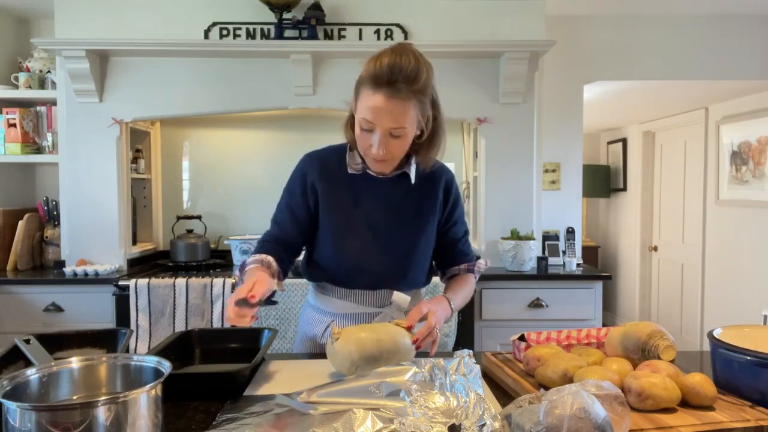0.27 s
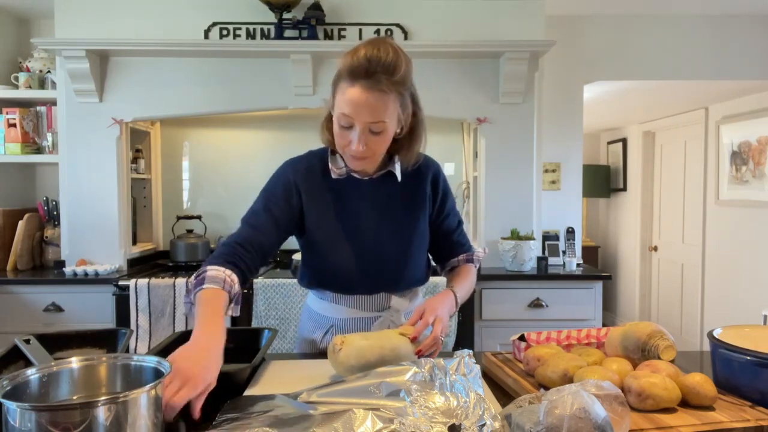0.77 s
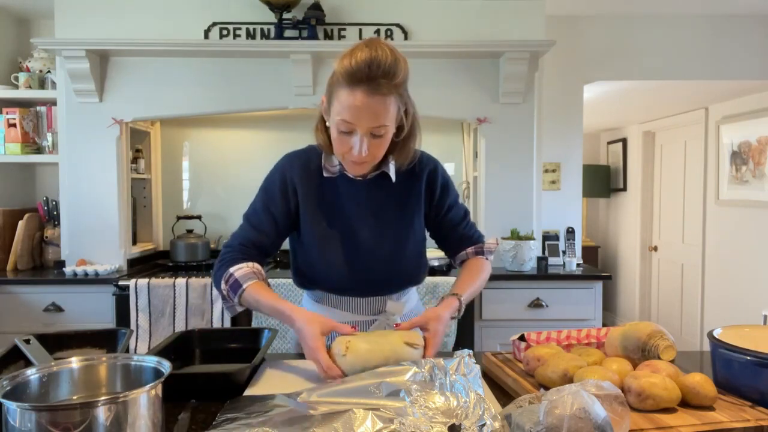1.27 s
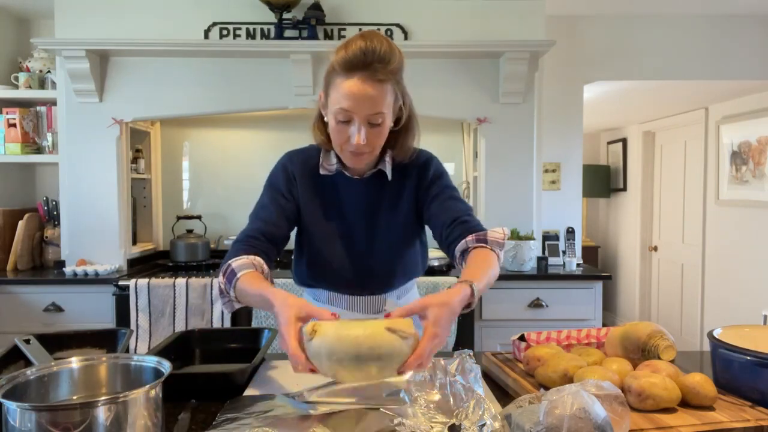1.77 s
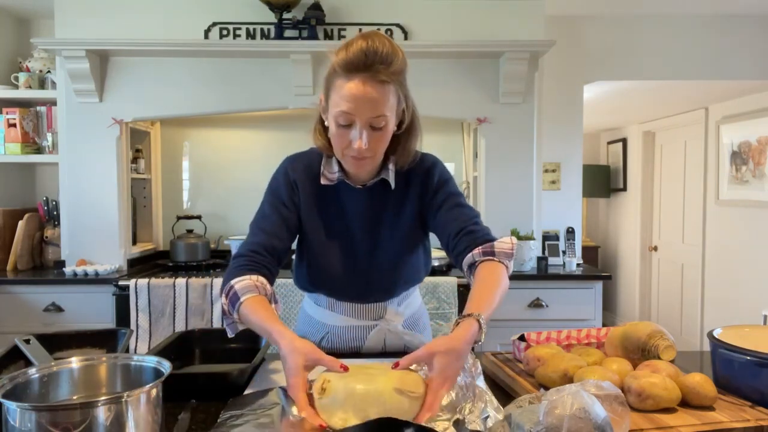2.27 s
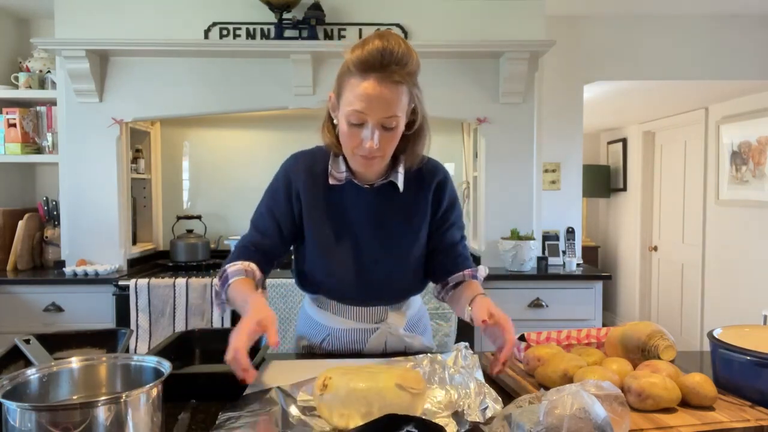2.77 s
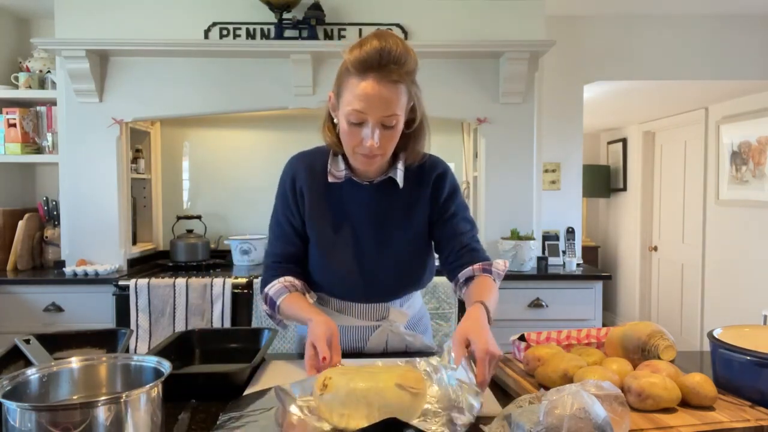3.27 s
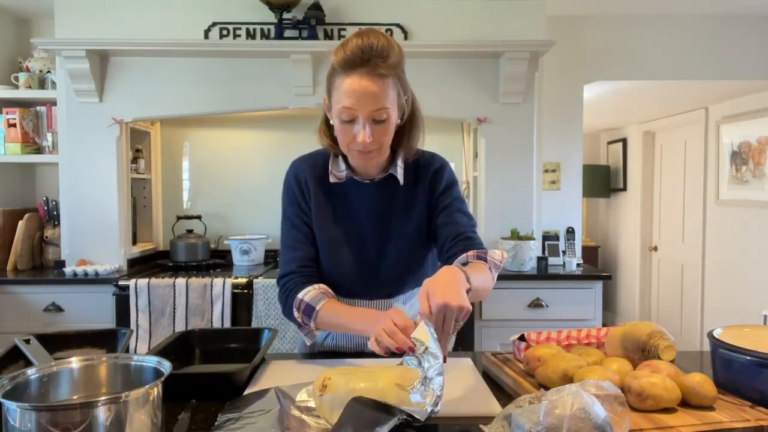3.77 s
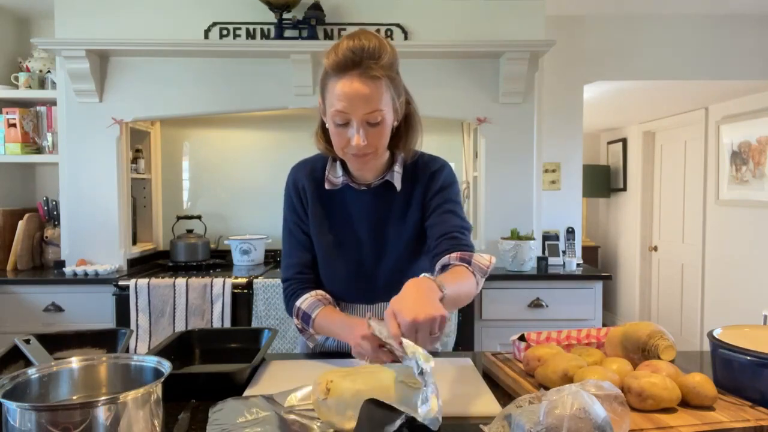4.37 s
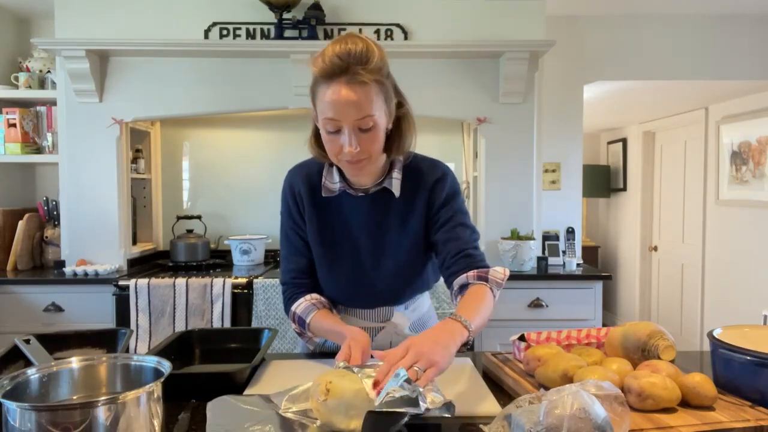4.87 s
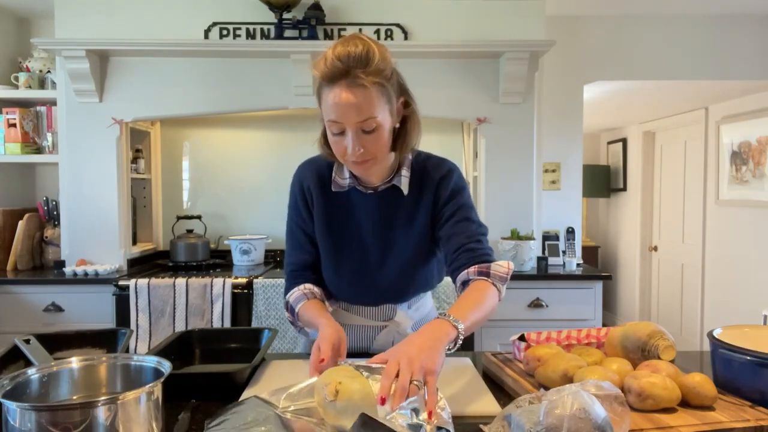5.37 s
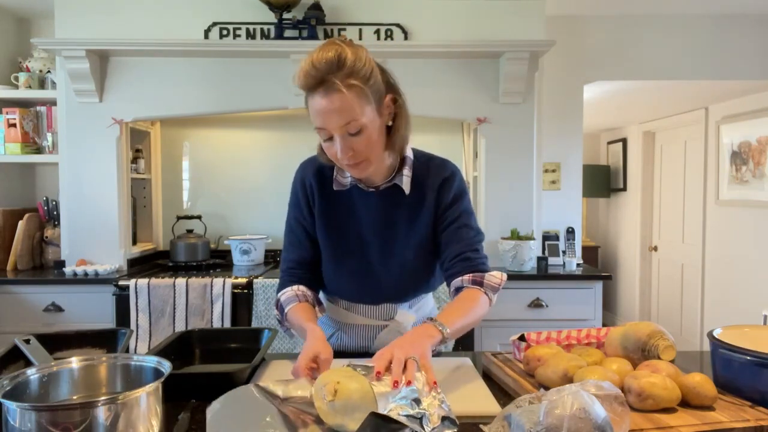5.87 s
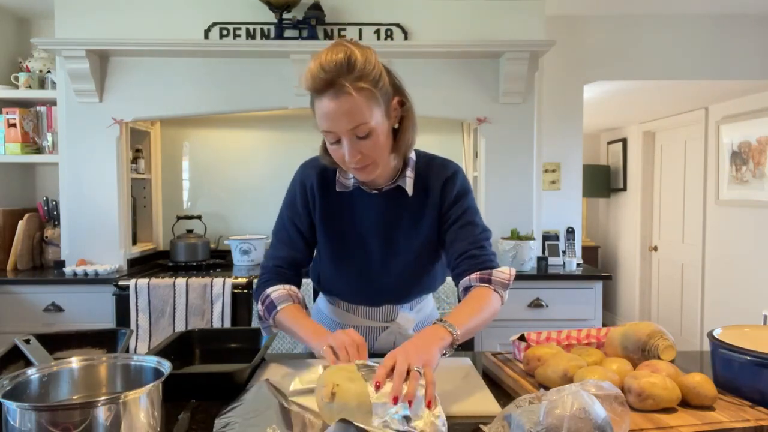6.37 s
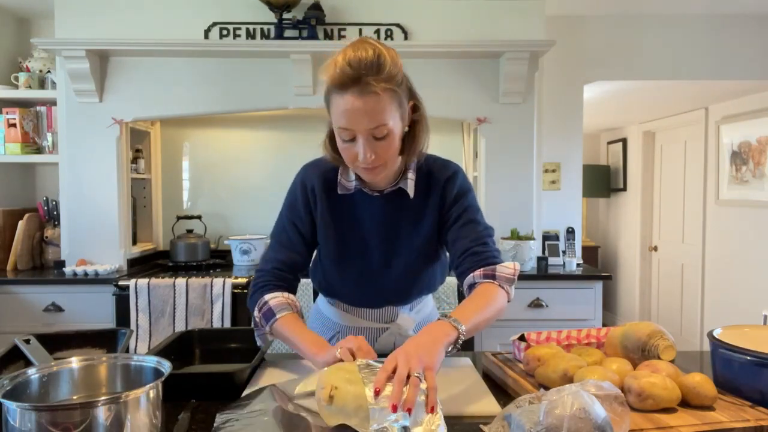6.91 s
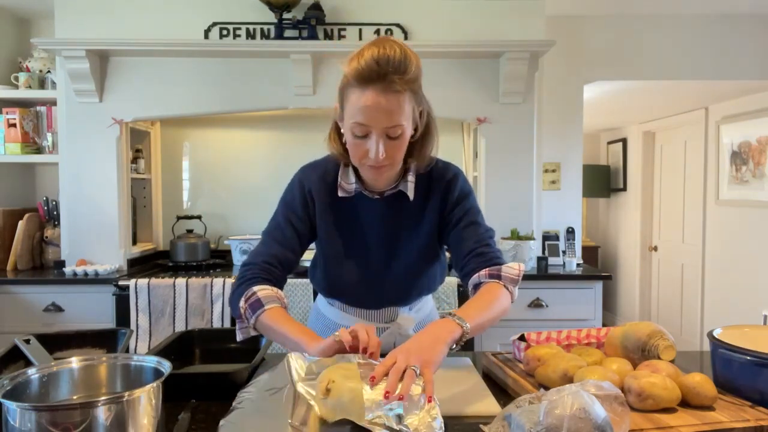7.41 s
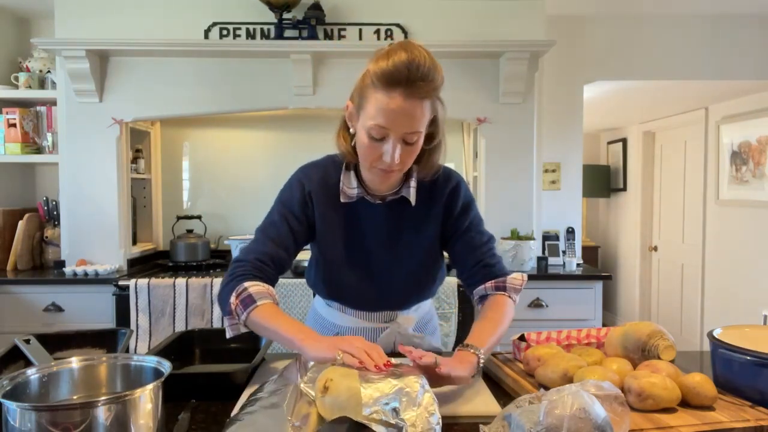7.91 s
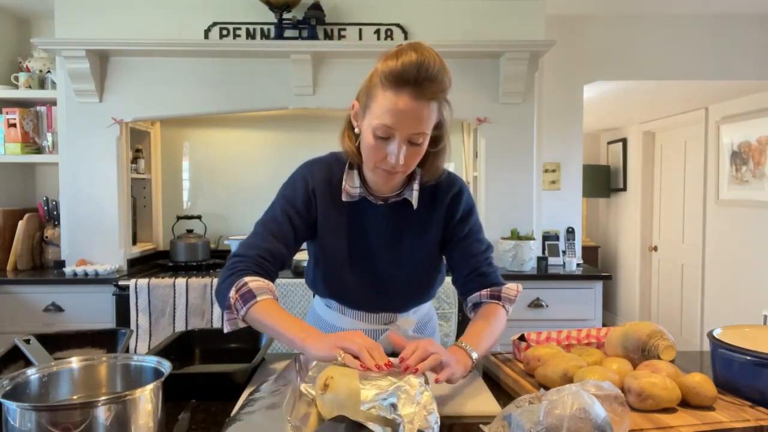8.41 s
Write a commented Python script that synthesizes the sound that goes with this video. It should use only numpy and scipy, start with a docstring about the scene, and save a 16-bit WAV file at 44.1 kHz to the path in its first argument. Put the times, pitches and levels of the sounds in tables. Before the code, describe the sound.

In a hard-walled home kitchen with a steady low appliance hum, a small utensil is laid down with quick clacks and a brief ring, touching a hollow tray. After a pause, foil crackles sharply as a soft, heavy parcel lands with two low thuds. Then the foil is folded almost continuously in short, bright crinkles, with hollow panel pops and a few tray knocks. Close stereo microphones catch the short room reflections.

```python
"""Hard-walled home kitchen: a pastry parcel is set down on tin foil and wrapped in it, on a board.
A small utensil is first laid aside: filtered noise puffs for clacks, decaying sines for its ringing.
Then squeezes of the foil crackle as random clicks set short resonances ringing; large panels pop.
The parcel lands with two thuds as a low board mode. An appliance hums on one low sine over noise.
The stereo image sets phase and likeness between left and right by frequency."""
import sys
import numpy as np
from scipy import signal
from scipy.fft import rfft, irfft, next_fast_len
from scipy.io import wavfile

SR = 44100
rng = np.random.default_rng(int(sys.argv[2]) if len(sys.argv) > 2 else 0)


def master_out(mix):
    """Clip the mix to full scale and print it as 16-bit PCM to the path in sys.argv[1]."""
    frames = np.transpose(np.atleast_2d(mix))
    ceiling = np.clip(frames, -1, 1)
    pcm = np.round(ceiling * 32767).astype(np.int16)
    wavfile.write(sys.argv[1], SR, pcm)


def how_loud(loudness_db):
    """Turn decibels into a plain amplitude multiplier (0 dB gives 1, 20 dB gives 10)."""
    steps = np.asarray(loudness_db, float) / 20
    return 10 ** steps


N = 381465
HZ = np.fft.rfftfreq(next_fast_len(N + SR), 1 / SR)

# room tone spectrum: [freq_hz, relative_db]
AIR_SPECTRUM = [(95, 8.5), (150, -2.5), (505, -4), (575, -15.5), (2210, -28.5), (3200, -26.5), (13000, -40)]
AIR_DB = -66.5
# faint appliance whines: [freq_hz, level_db, half_width_hz]
WHINES = [(2947, -82, 59), (3500, -87, 46)]
HUM_HZ, HUM_DB = 71.492, -34  # level ahead of the left and right gains
# utensil touching down: [start_s, level_db, clack_re_level_db, tick_re_level_db]
CLACKS = [(0.62, -33.5, -4, -6), (0.723, -29, -31, -30), (0.741, -39, 0.5, -4.5), (0.786, -41, -4.5, -7.5),
          (0.817, -47.5, 6, -9.5), (0.827, -31.5, -0.5, 12), (0.862, -30, -11.5, -7),
          (1.047, -43.5, -8.5, -18)]
# utensil modes: [freq_hz, level_db, t60_s]
UTENSIL_MODES = [(322, -9.5, 0.11), (420, -9, 0.049), (872, -5.5, 0.072), (1110, -20, 0.043),
                 (1633, -7, 0.054), (1880, -15, 0.082), (2280, -19, 0.109), (2600, -16.5, 0.069),
                 (4150, -13, 0.091)]
# tray rung as the utensil rocks on it, later as it is nudged: [start_s, level_db]
TRAY_TOUCHES = [(1.048, -39), (1.132, -48), (1.154, -55), (1.18, -57), (4.485, -32), (4.606, -28),
                (4.623, -44), (7.968, -44)]
# hollow tray modes: [freq_hz, level_db, t60_s]
TRAY_MODES = [(689, -1.5, 0.1), (763, -1.5, 0.05)]
# squeezes of the foil: [start_s, rise_s, hold_s, crackle_db]
SQUEEZES = [(1.88, 0.052, 0.022, -54), (1.93, 0.015, 0.013, -24.5), (1.98, 0.048, 0.098, -25.5),
            (2.13, 0.0059, 0.011, -20), (2.206, 0.011, 0.057, -31), (2.296, 0.02, 0.044, -30.5),
            (2.402, 0.005, 0.021, -33), (2.465, 0.0072, 0.028, -37), (2.669, 0.0063, 0.023, -53),
            (2.737, 0.0088, 0.023, -55.5), (2.82, 0.021, 0.034, -28.5), (2.979, 0.013, 0.041, -47.5),
            (3.123, 0.025, 0.081, -36.5), (3.208, 0.039, 0.03, -26.5), (3.268, 0.026, 0.09, -30.5),
            (3.345, 0.0041, 0.17, -31), (3.538, 0.0075, 0.075, -34), (3.661, 0.0092, 0.083, -36.5),
            (3.78, 0.0052, 0.067, -35.5), (3.892, 0.027, 0.14, -26), (4.11, 0.0071, 0.064, -29.5),
            (4.215, 0.013, 0.032, -38), (4.256, 0.01, 0.043, -35), (4.334, 0.009, 0.074, -32),
            (4.426, 0.0072, 0.13, -28.5), (4.526, 0.0055, 0.077, -30.5), (4.657, 0.012, 0.044, -28),
            (4.759, 0.03, 0.089, -30.5), (4.922, 0.0068, 0.061, -26.5), (5.007, 0.012, 0.06, -29.5),
            (5.116, 0.016, 0.026, -34), (5.215, 0.014, 0.13, -33), (5.377, 0.025, 0.0092, -31.5),
            (5.417, 0.0075, 0.027, -27), (5.477, 0.028, 0.085, -27), (5.65, 0.02, 0.03, -27.5),
            (5.721, 0.013, 0.035, -23.5), (5.809, 0.023, 0.16, -29.5), (5.965, 0.0081, 0.12, -32.5),
            (6.029, 0.03, 0.092, -26.5), (6.196, 0.013, 0.074, -33.5), (6.293, 0.017, 0.12, -31),
            (6.38, 0.014, 0.045, -31.5), (6.458, 0.012, 0.023, -29.5), (6.551, 0.0063, 0.14, -34),
            (6.641, 0.016, 0.069, -30.5), (6.757, 0.017, 0.019, -26), (6.862, 0.0037, 0.097, -28.5),
            (7.013, 0.042, 0.037, -29.5), (7.084, 0.018, 0.13, -27.5), (7.265, 0.032, 0.022, -31),
            (7.338, 0.0077, 0.023, -32), (7.401, 0.022, 0.015, -31), (7.445, 0.0054, 0.035, -28.5),
            (7.567, 0.017, 0.025, -34), (7.655, 0.0082, 0.06, -34), (7.79, 0.0074, 0.034, -31.5),
            (7.872, 0.006, 0.0065, -34), (7.912, 0.0046, 0.0071, -36.5), (7.985, 0.023, 0.081, -31),
            (8.114, 0.02, 0.038, -32), (8.217, 0.0054, 0.024, -30.5), (8.302, 0.011, 0.093, -31),
            (8.427, 0.014, 0.026, -37), (8.485, 0.011, 0.043, -33.5)]
RELEASE_DB_PER_S = 200.5
SETTLE_DB, SETTLE_DB_PER_S = -8.5, 89.5  # once let go, the creases creep on faintly
# opening snap: dB over the crackle at a rise of QUICK_RISE_S, more for each halving of the rise
SNAP_DB, QUICK_RISE_S, SNAP_DB_PER_HALVING = 6, 0.0077, 8
# sheet free to rattle in large panels: [time_s, level_re_crackle_db]
PANELS = [(1.9, -22), (2.2, -6), (2.5, -18.5), (2.8, -11), (2.9, -17), (3.1, -1.5), (3.5, -18), (3.75, 0),
          (4.15, -20), (4.5, -6.5), (5.5, -12.5), (6.1, -33), (6.4, -10.5), (6.6, -28.5), (6.9, -11.5),
          (7.45, -10.5), (7.8, -17.5), (8.2, -9.5), (8.65, -23)]
# foil colour: [freq_hz, gain_db]
FOIL_SPECTRUM = [(150, -14), (400, -6.5), (1000, -5.5), (2500, -2.5), (4500, -2), (6500, 0), (11500, -2),
                 (15800, -3)]
# parcel lands and rocks once: [start_s, level_db]
THUDS = [(2.153, -33), (2.232, -38)]
BOARD_HZ, BOARD_T60_S, THUD_LOWPASS_HZ = 55, 0.2, 120
# large panels popping: [start_s, level_db, pitch_hz]
POPS = [(2.82, -35.5, 895), (3.902, -35, 800), (4.269, -29.5, 680), (4.308, -29.5, 2280),
        (4.376, -25.5, 990), (4.423, -25.5, 725), (4.443, -26.5, 570), (4.541, -25.5, 655),
        (4.601, -30.5, 724), (4.778, -31, 505), (4.814, -25, 1245), (4.892, -26, 1450), (4.951, -29.5, 970),
        (4.999, -27, 550), (5.119, -27, 770), (5.24, -34, 1750), (5.973, -25, 4100), (6.347, -28.5, 768),
        (6.867, -26.5, 820), (6.876, -26.5, 378), (6.947, -34, 400), (7.055, -25.5, 1930),
        (7.097, -22, 1510), (7.132, -23.5, 1020), (7.464, -31.5, 283), (8.018, -31, 1187),
        (8.139, -28, 916), (8.226, -31, 1154), (8.277, -32, 880)]
# kitchen decay: [freq_hz, t60_s]
KITCHEN_T60 = [(200, 0.28), (8000, 0.34), (15000, 0.19)]
# stereo image, phase between left and right and their likeness: [freq_hz, phase_rad, likeness_0_to_1]
STEREO_IMAGE = [(100, 0, .85), (1000, .36, .7), (2400, .7, .55), (4500, 1.3, .2), (5900, 0, .3),
                (7800, -1.9, .5), (8300, -3.14, .99), (9500, -3.14, .99), (9800, -4.9, .7),
                (10600, -5.1, .7), (11100, -6.28, .96), (12600, -6.28, .96), (13300, -9.42, .99),
                (15200, -9.42, .99), (15600, -10.9, .7)]
# stereo balance: [freq_hz, left_over_right_db]
LEFT_LEAN = [(110, -5.5), (200, 2), (700, 0.5)]
SPREAD = np.array([[1], [.6]])  # gains of the shared and unrelated parts that stereo() takes


def rms_one(x):
    """Scale to unit rms."""
    return x / np.sqrt(np.mean(x ** 2) + 1e-20)


def in_time(rows):
    """Table columns as sample-rate curves."""
    s, *columns = np.transpose(rows)
    return [np.interp(np.arange(N) / SR, s, c) for c in columns]


def at_hz(rows, hz):
    """Table columns read on a log-frequency axis."""
    f, *columns = np.transpose(rows)
    return [np.interp(np.log(hz + 1), np.log(f), c) for c in columns]


def shaped(x, response):
    """Multiply the spectrum by a response."""
    size = 2 * (len(HZ) - 1)
    return irfft(rfft(x, size) * response, size)[..., :N]


def drift(rate_hz):
    """Slow random curve of unit rms: noise through two equal poles."""
    r = np.exp(-2 * np.pi * rate_hz / SR)
    noise = rng.standard_normal(N + SR)
    return rms_one(signal.lfilter([1], [1, -2 * r, r * r], noise)[SR:])


def cut(x, hz, kind):
    """Second-order low- or high-pass."""
    return signal.sosfilt(signal.butter(2, hz, kind, fs=SR, output="sos"), x)


def clicks_at(times_s, levels_db):
    """One-sample clicks."""
    clicks = np.zeros(N)
    clicks[(np.array(times_s) * SR).astype(int)] = how_loud(levels_db)
    return clicks


def ring(clicks, hz, t60_s):
    """Two-pole resonator: a unit click sets off a decaying sine of height 1."""
    r, w = how_loud(-60 / (t60_s * SR)), 2 * np.pi * hz / SR
    return signal.lfilter([0, np.sin(w)], [1, -2 * r * np.cos(w), r * r], clicks + 1e-18)


def ring_modes(modes, times_s, levels_db):
    """A struck body rings in all its modes, unevenly from touch to touch."""
    out = np.zeros((2, N))
    for hz, mode_db, t60_s in modes:
        uneven_db = rng.normal(0, 1.3, len(times_s))
        clicks = clicks_at(times_s, levels_db + mode_db + uneven_db)
        out += ring(cut(clicks, 2 * hz, "low"), hz, t60_s) * SPREAD
    return out


def bursts(times_s, levels_db, decay_s, rise_s=0.00017):
    """A dying puff of noise at each time (time constants), in two unrelated draws."""
    rise, fall = np.exp(-1 / (rise_s * SR)), np.exp(-1 / (decay_s * SR))
    clicks = clicks_at(times_s, levels_db)
    swell = signal.lfilter([1 - rise], [1, -rise], clicks + 1e-18) * decay_s * SR
    envelope = signal.lfilter([1 - fall], [1, -fall], swell)
    return envelope * rng.standard_normal((2, N))


def room_tone():
    """Appliance rumble and faint whines: shaped noise in two unrelated draws."""
    response = how_loud(at_hz(AIR_SPECTRUM, HZ)[0]) * (HZ > 90)
    air = rms_one(shaped(rng.standard_normal((2, N)), response)) * how_loud(AIR_DB)
    for hz, level_db, half_width_hz in WHINES:
        peak = 1 / (1 + ((HZ - hz) / half_width_hz) ** 2)
        air += how_loud(level_db) * rms_one(shaped(rng.standard_normal((2, N)), peak))
    return air


def appliance_hum():
    """One low sine, its level drifting slightly."""
    level = np.sqrt(2) * how_loud(HUM_DB + 0.29 * drift(3.4))
    return level * np.sin(2 * np.pi * HUM_HZ * np.arange(N) / SR + 5.2)


def low_rumble():
    """Noise around 42-58 Hz."""
    return how_loud(-70.0) * rms_one(cut(cut(rng.standard_normal(N), 58, "low"), 42, "high"))


def utensil():
    """Each touch is a dull knock, a clack and a bright tick; all but the last ring the tool."""
    s, level_db, clack_db, tick_db = np.transpose(CLACKS)
    knock = cut(cut(bursts(s, level_db + 2.5, 0.02), 1500, "low"), 220, "high")
    clack = cut(cut(bursts(s, level_db + clack_db + 7.5, 0.014), 2000, "high"), 3600, "low")
    tick = cut(bursts(s, level_db + tick_db + 2.5, 0.0048), 3700, "high")
    tick = cut(cut(tick, 3500, "high"), 7500, "low")
    ring_db = level_db + 0.3 * clack_db - 2.2  # harder clacks ring more
    return knock + clack + tick + ring_modes(UTENSIL_MODES, s[:-1], ring_db[:-1])


def tray():
    """The hollow tray rings in two close modes when rocked on or nudged."""
    return ring_modes(TRAY_MODES, *np.transpose(TRAY_TOUCHES))


def squeeze_effort_db():
    """Crackle level: every squeeze rises, holds, lets go and settles; their powers add."""
    t, power = np.arange(N // 32 + 2) * 32 / SR, 1e-12
    for start_s, rise_s, hold_s, level_db in SQUEEZES:
        rise_s = max(rise_s, .002)
        after_s = np.maximum(t - start_s - rise_s - hold_s, 0)
        release = how_loud(-2 * RELEASE_DB_PER_S * after_s)
        settle = how_loud(2 * (SETTLE_DB - SETTLE_DB_PER_S * after_s))
        rise = np.clip((t - start_s) / rise_s, 0, 1) ** 2
        power = power + rise * how_loud(2 * level_db) * (release + settle)
    return np.interp(np.arange(N) / SR, t, 10 * np.log10(power))


def buckles(clumps, per_s, spread_db, low_hz, high_hz, cycles, patchy_db):
    """Facets flip at random, each ringing a few cycles at the pitch of its size; two sets of facets."""
    sizes = how_loud(spread_db * np.minimum(rng.exponential(1, (2, N)), 4.0)) * rng.choice([-1, 1], (2, N))
    flips = sizes * (rng.random((2, N)) < per_s / SR) * clumps
    pitches_hz, dealt = np.geomspace(low_hz, high_hz, 12), rng.integers(0, 12, N)
    turns = [how_loud(patchy_db * drift(29.0)) for _ in pitches_hz[::3]]  # neighbouring sizes swell together
    out = 0
    for k, hz in enumerate(pitches_hz):
        clicks = flips * (dealt == k) * turns[k // 3]
        out = out + ring(clicks, hz, cycles / hz) * hz ** 0.77
    return rms_one(out)


def crease_snaps():
    """One crease snaps as each squeeze opens, louder the quicker the rise: high-passed noise puffs."""
    s, rise_s, _, level_db = np.transpose(SQUEEZES)
    halvings = np.log2(QUICK_RISE_S / np.maximum(rise_s, .002))
    snap_db = level_db + SNAP_DB + SNAP_DB_PER_HALVING * halvings
    return cut(bursts(s, snap_db, 0.011, rise_s=0.0038), 3100, "high")


def foil():
    """Small facets crackle, large panels rattle low, single creases snap."""
    crackle_db, panel_db = squeeze_effort_db(), in_time(PANELS)[0]
    clumps_db = 1.61 * drift(32.0) + 2.27 * drift(62.0)  # buckles swell in clumps
    facets = buckles(how_loud(clumps_db), 4200.0, 1.93, 1104, 13400, cycles=4.64, patchy_db=2.2)
    dull = cut(facets, 4700, "low")
    sheen_db = 0.37 * (crackle_db + 25.5) + 1.56 * drift(3.9)  # harder handling is brighter
    crackle = how_loud(crackle_db) * (dull + how_loud(sheen_db) * (facets - dull))
    wobble = how_loud(0.69 * clumps_db + 3.3 * drift(3.2))
    panels = buckles(wobble, 420.0, 3.76, 209, 2000, cycles=3.3, patchy_db=3.0)
    rattle = how_loud(crackle_db + panel_db) * panels
    return shaped(crackle + rattle + crease_snaps(), how_loud(at_hz(FOIL_SPECTRUM, HZ)[0]))


def thuds():
    """A soft heavy landing sets the board and worktop booming in one low mode."""
    boom = ring(clicks_at(*np.transpose(THUDS)), BOARD_HZ, BOARD_T60_S)
    return cut(boom, THUD_LOWPASS_HZ, "low")


def pops():
    """A panel flips and rings a few cycles at its own pitch, overtones differing from flip to flip."""
    t, out = np.arange(SR // 10) / SR, np.zeros((2, N + SR))
    envelope = (1 - np.exp(-t / 0.00044)) * np.exp(-t / 0.0051)
    for (s, level_db, hz), (phase, spread) in zip(POPS, rng.random((len(POPS), 2, 2, 1))):
        phase, turn = 2 * np.pi * phase, 2 * np.pi * hz * t
        tone = np.sin(turn + phase)
        tone = tone + 0.38 * np.sin((1.27 + 0.18 * spread) * turn + 2 * phase)
        tone += 0.55 * np.sin((1.7 + 0.98 * spread[::-1]) * turn - phase)
        start = int(s * SR)
        out[:, start:start + len(t)] += how_loud(level_db) * envelope * tone * SPREAD
    s, level_db, _ = np.transpose(POPS)
    crunch = cut(bursts(s, level_db + 5.5, 0.0017), 2400, "low")
    return out[:, :N] + crunch


def kitchen(x, wet_db):
    """Direct sound plus a dense noise tail, dying band by band."""
    t, tails, patterns = np.arange(SR // 2) / SR, 0, 8
    for low_hz in 100 * 2.0 ** np.arange(8):
        band = signal.butter(2, [low_hz, min(2 * low_hz, .45 * SR)], "band", fs=SR, output="sos")
        t60_s = at_hz(KITCHEN_T60, 1.95 * low_hz)[0]
        noise = rng.standard_normal((patterns, 2, len(t)))
        tails = tails + signal.sosfilt(band, noise) * how_loud(-60 * t / t60_s) * (t > .003)
    tails /= np.sqrt(np.sum(tails ** 2, axis=2, keepdims=True))
    # the echo pattern switches at random among eight, so no steady tones build up
    chosen = np.repeat(rng.integers(0, patterns, N // 1000 + 1), 1000)[:N]
    wet = sum(signal.fftconvolve(x * (chosen == k), tails[k], axes=1)[:, :N] for k in range(patterns))
    return (x + how_loud(wet_db) * wet) / np.sqrt(1 + how_loud(2 * wet_db))


def stereo(shared, unrelated):
    """Left and right get a shared part, phase-turned between them, and an unrelated part of opposite sign."""
    phase_rad, alike = at_hz(STEREO_IMAGE, HZ)
    alike, sign = np.clip(alike, 0, 1), np.array([[-1], [1]])
    lean = how_loud(-sign * at_hz(LEFT_LEAN, HZ)[0] / 2)
    turn = np.exp(1j * phase_rad * sign / 2) * lean
    common = shaped(shared, np.sqrt((1 + alike) / 2) * turn)
    return common + shaped(unrelated, sign * np.sqrt((1 - alike) / 2) * turn)


def scene():
    """Foil, utensil and tray in the room, over room tone, hum and thuds."""
    field = kitchen(foil(), wet_db=-1.5)
    field = field + kitchen(pops() + utensil() + tray(), wet_db=-4.0) + room_tone()
    lows = appliance_hum() + low_rumble() + thuds()
    return stereo(*field) + lows * how_loud([[1.5], [-1.8]])


def low_pass(x):
    """Removes everything above the highest recorded frequency."""
    return signal.sosfilt(signal.butter(12, 15920, fs=SR, output="sos"), x)


def record(dry):
    """Cut the top at 15930 Hz."""
    mix = shaped(dry, HZ < 15930)
    return low_pass(mix)


dry = scene()
out = record(dry)
master_out(out)
```